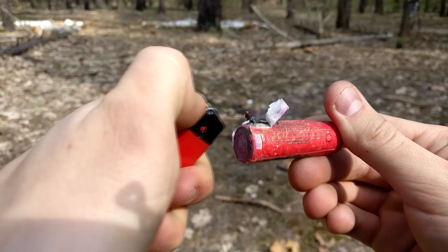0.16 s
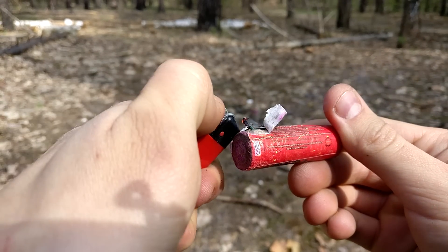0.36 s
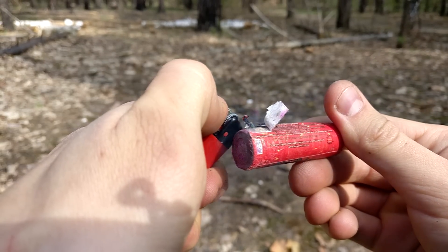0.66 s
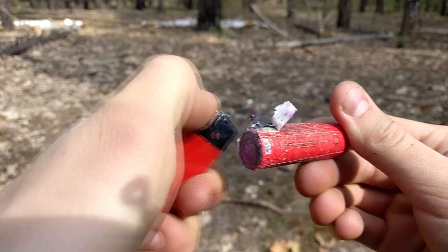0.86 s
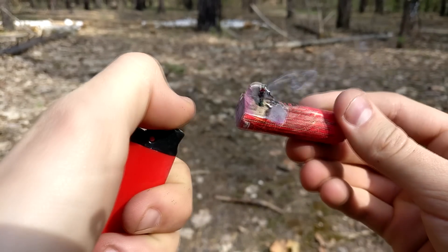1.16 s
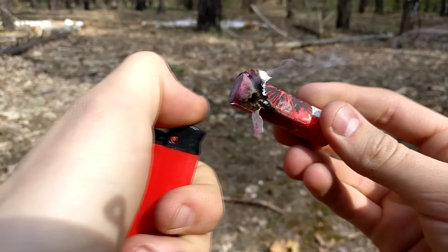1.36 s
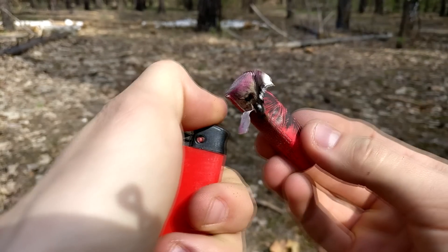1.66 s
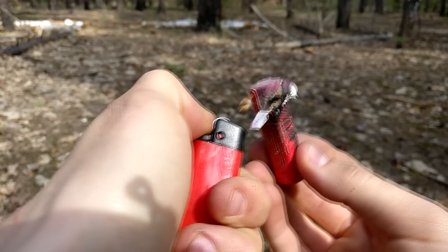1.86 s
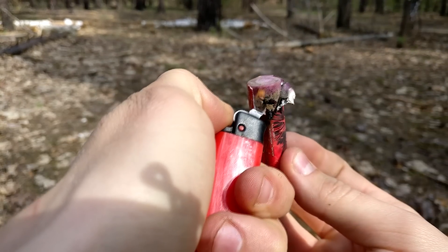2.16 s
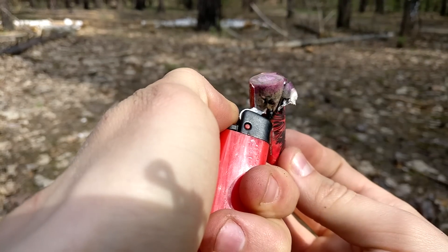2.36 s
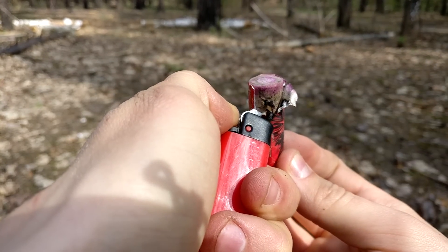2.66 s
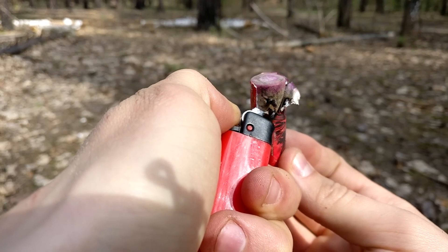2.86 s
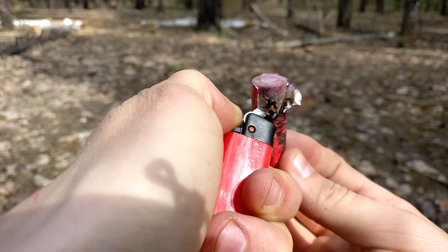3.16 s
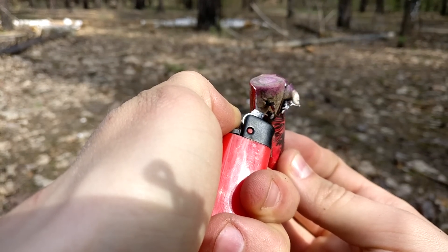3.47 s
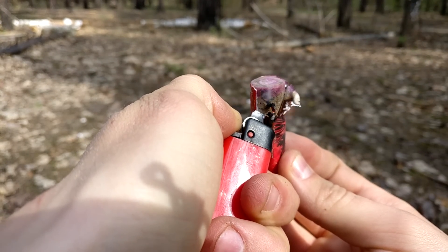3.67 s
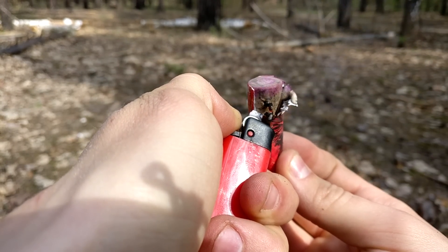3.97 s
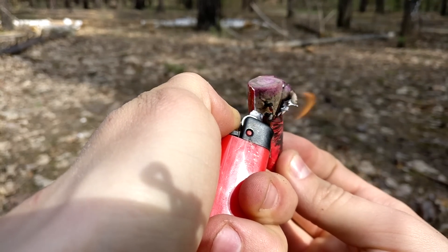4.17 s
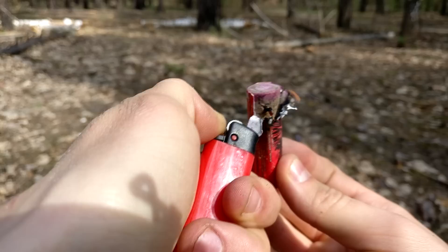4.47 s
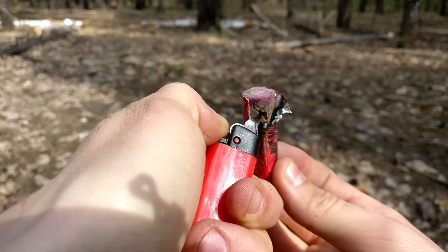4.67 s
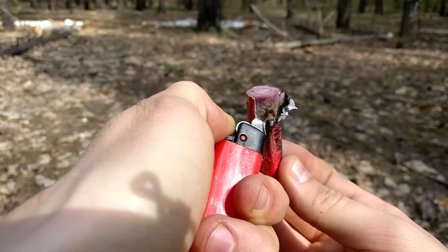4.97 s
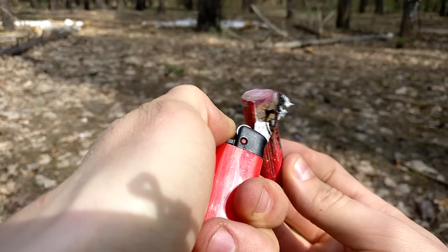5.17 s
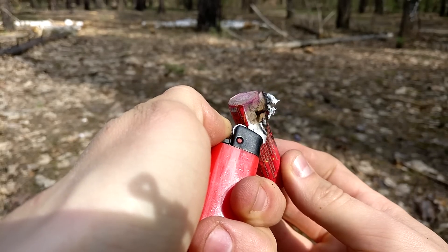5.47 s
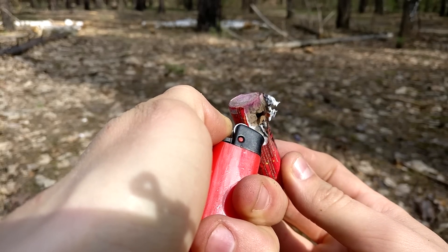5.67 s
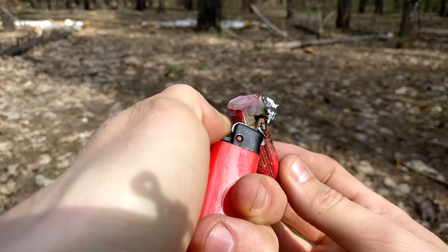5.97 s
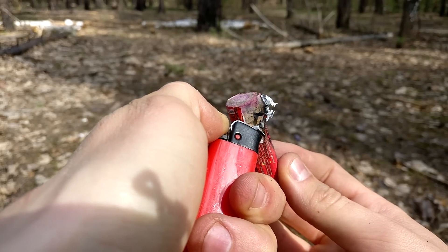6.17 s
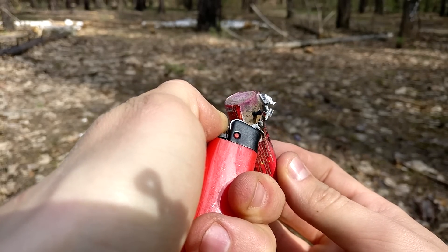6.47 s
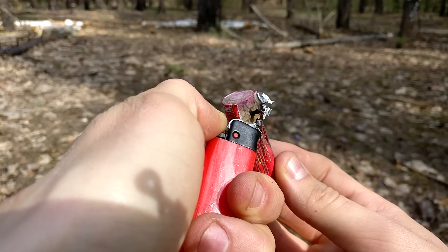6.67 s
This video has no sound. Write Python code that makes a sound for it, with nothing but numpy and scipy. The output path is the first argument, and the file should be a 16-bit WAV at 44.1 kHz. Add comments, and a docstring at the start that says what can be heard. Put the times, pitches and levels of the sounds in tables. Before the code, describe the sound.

A disposable lighter is struck once up close among light finger ticks, with wind rumbling on the microphone and faint forest birds.

```python
"""The tail of a flint stroke, close to a stereo microphone in a wood; then the disposable lighter is
struck in full, its wheel rasping on the flint and its metal parts clicking. Gas hisses from the valve,
the flame pops softly, and fingers rub and tick on the plastic case. Further off, one bird whistles
while two others pipe and chip, all echoing from the trunks. Wind rumbles on the microphone throughout."""
import sys
import numpy as np
from scipy import signal
from scipy.fft import rfft, irfft, next_fast_len
from scipy.io import wavfile

SR = 44100
rng = np.random.default_rng(int(sys.argv[2]) if len(sys.argv) > 2 else 0)


def store_wav(level_fs):
    """Save 16-bit WAV to argv[1]."""
    pcm = np.round(np.clip(np.atleast_2d(level_fs), -1, 1) * 32767)
    wavfile.write(sys.argv[1], SR, pcm.T.astype(np.int16))


N = 301321
TIME = np.arange(N) / SR

# strokes of the flint wheel: (time of top speed [s], level [dB])
STROKES = [(.003, -17.5), (1.7697, -10)]
# the thumb's position colours the rasp, one spectrum a stroke: (frequency [Hz], relative level [dB])
STROKE_COLOURS = [
    [(500, 16), (1900, 3), (2900, -5), (4100, 3.5), (5800, -11.5), (9000, 0.5), (13500, 5.5), (16000, 7)],
    [(450, 6.5), (1450, 9), (2000, 1.5), (2400, -4), (3100, -0.5), (4500, 1), (6100, -1.5), (8800, 0.5),
     (12500, 0.5), (15500, 6.5)],
]
# clicks of wheel, spring and lever: (time [s], level [dB], gain below the treble [dB])
CLICKS = [(1.64, -25.5, -1.5), (1.6852, -30, 8.5), (1.696, -22, 7), (1.704, -23, 1.5), (1.708, -30.5, -0.5),
          (1.7112, -23, -1), (1.7172, -13.5, 7.5), (1.7402, -4, 0), (1.7592, 13, -11.5), (1.7668, 11, -14),
          (1.811, -5, -9)]
# narrow peaks that colour the strike's rasp and clicks: (frequency [Hz], width [Hz], relative level [dB])
STRIKE_PEAKS = [(2503, 20, 12), (3047, 35, 11.5), (4405, 70, 16.5), (5328, 75, 13), (6605, 50, 9),
                (7115, 30, 8), (7705, 50, 11), (9888, 25, 6), (10232, 35, 6), (10980, 45, 6),
                (11265, 40, 7), (11580, 28, 7), (13289, 30, 2), (13600, 32, 6)]
# colour of the hand-held lighter at the microphone's two ports: (frequency [Hz], left [dB], right [dB])
LIGHTER_COLOUR = [(28.5, -47.5, -50), (151.5, -24, -20), (444, -23.5, -24), (801, -32, -15),
                  (1860, -9, -9.5), (2274, 0.5, 0.5), (2680, -1.5, 10), (3915, -0.5, 0), (5610, 0, -3.5),
                  (6870, 5, 3), (7850, -9.5, -12), (8700, -13, -1), (10340, -15, 2.5), (14000, -9, 2),
                  (15700, -10, -9)]
# the lighter's phase between the ports: (frequency [Hz], lead of the left port [rad])
LIGHTER_PHASE = [(0, 0), (1400, -1.5), (2200, -2.5), (3500, -4.5), (5600, -6.5), (7200, -1.5), (8100, -8),
                 (10500, -8), (12200, -8), (14400, 3.5), (16000, 0.5)]
# gas flowing while the lever is held: (start [s], length [s], level [dB], lag of the left port [s])
BURNS = [(-.03, 0.23, -47.5, 0.00017), (3.987, 0.44, -51, 0.00013)]
# colour of the gas jet at the ports: (frequency [Hz], left [dB], right [dB])
GAS_COLOUR = [(500, -10, -10), (1200, 3, -5.5), (2230, -10, -8), (2770, -1.5, 4), (3200, 3.5, 8),
              (3870, -4, 0.5), (4510, -10, 3), (4830, -13, -9), (5650, -4.5, -8), (6000, -19, -16),
              (7300, -37, -27), (9500, -18, -13.5), (11900, -45, -5.5), (13100, -7, -7), (13800, -18, -12),
              (15000, -14, -9), (15500, -6, -1.5)]
# soft pops of the flame and bumps of the hand: (time [s], thump [dB], snap [dB])
POPS = [(0.1314, -38, -27), (0.1645, -39, -28), (0.212, -46, -30), (0.2988, -31.5, -42),
        (3.453, -30, -24.5), (4.3081, -34.5, -28), (4.3186, -45, -32)]
# colour of a pop's snap: (frequency [Hz], relative level [dB])
SNAP_COLOUR = [(100, 12), (500, 18.5), (1100, 10), (2500, 8), (6000, -5), (9000, -35), (16000, -57)]
# light taps on the metal hood: (time [s], level [dB])
HOOD_TAPS = [(2.072, -26), (2.12, -23.5)]
# ringing of the hood: (frequency [Hz], width [Hz], relative level [dB])
HOOD_MODES = [(3100, 120, -3.5), (5930, 130, 0), (8320, 150, 4), (9640, 70, -7), (10850, 33, -9),
              (13270, 130, 3)]
# skin sliding on plastic: (middle [s], length [s], level [dB])
RUBS = [(0.462, 0.22, -57.5), (0.741, 0.041, -56), (0.876, 0.12, -55.5), (1.17, 0.04, -48),
        (1.206, 0.2, -55), (1.367, 0.069, -59), (2.77, 0.31, -65), (3.22, 0.9, -65.5), (3.7, 0.21, -59.5),
        (3.937, 0.34, -68), (4.76, 0.29, -66.5), (5.865, 0.18, -62.5)]
# the sharpest ticks of nails on plastic, and at 1.616 s the two lighters' cases knocking together: (time [s],
# snap [dB], ring of the case [dB])
NAIL_TICKS = [(0.3275, -26.5, -41), (.4735, -27, -40), (0.498, -33, -43), (.671, -32, -54),
              (.8777, -24.5, -45), (.909, -36, -36), (1.061, -31.5, -45), (1.105, -40, -39),
              (1.17, -19, -48), (1.184, -14.5, -30), (1.278, -46, -34), (1.291, -13.5, -42),
              (1.298, -23.5, -40), (1.348, -39, -36), (1.368, -34, -33), (1.38, -30.5, -33.5),
              (1.616, -23, -19.5), (2.92, -27, -43), (3.6755, -24, -41), (3.704, -30, -44),
              (3.746, -27, -44), (3.7662, -29, -41), (3.774, -35, -45), (3.897, -30, -50),
              (3.926, -29, -52), (3.9824, -25.5, -47), (4.002, -33, -46), (4.742, -28.5, -33),
              (5.5494, -25.5, -40), (5.938, -33, -44)]
# ringing of the hollow plastic case: (frequency [Hz], width [Hz], relative level [dB])
CASE_MODES = [(2970, 160, -7), (3623, 260, 4.5), (6435, 250, -2)]
# the nearest bird: (start [s], length [s], top pitch [Hz], crest [share of the note],
# fall [share of the pitch], level before the accent [dB], accent [weight])
WHISTLES = [(.368, .183, 4630, .36, .1, -57, 1), (1.455, .19, 4570, .31, .055, -61, 3),
            (2.443, .185, 4560, .5, .06, -63.5, 5), (3.393, .202, 4570, .4, .07, -60, 4.5),
            (4.865, .203, 4560, .6, .065, -68.5, 5), (6.15, .217, 4540, .52, .07, -65.5, 4)]
# a far bird, loudest in mid-phrase: (start [s], length [s], pitch [Hz], level [dB])
PIPES = [(1.275, .07, 3320, -66), (1.635, .07, 3300, -64), (1.978, .075, 3280, -61),
         (2.355, .09, 3260, -61.5), (2.715, .115, 3240, -62.5), (3.105, .085, 3210, -65.5)]
# rumble of wind on the microphone: (frequency [Hz], relative level [dB])
WIND_COLOUR = [(15, -65.5), (25, -42), (32, -34.5), (40, -15), (50, 2), (60, 0.5), (72, 0.5), (90, -6),
               (125, -8.5), (160, -13), (220, -20), (320, -28.5), (420, -39.5), (600, -72)]
# eddies that strike the ports unequally: (middle [s], length [s], left [dB], right [dB])
BUFFETS = [(0.03, 0.57, -55, -41), (0.28, 0.35, -40, -43), (0.595, 0.31, -46, -68), (0.895, 0.89, -49, -66),
           (1.159, 0.094, -63, -43), (3.46, 0.057, -39, -53), (3.685, 0.42, -45.5, -56),
           (3.918, 0.09, -54, -44), (4.763, 0.056, -44.5, -55), (6.485, 0.081, -52, -61)]
# air in the trees: (frequency [Hz], relative level [dB])
AIR_COLOUR = [(220, -41), (380, -8), (571, -5.5), (722, -0.5), (913, 0), (1070, 1.2), (1460, -2.5),
              (2090, -12), (2860, -16.3), (4230, -17), (6770, -26), (10500, -26), (16000, -19.5)]
# how alike moving air is at the two ports: (frequency [Hz], correlation [0-1])
PORT_LIKENESS = [(30, 0.89), (70, 1), (130, 0.96), (300, 0.87), (600, 0.42), (1200, 0.13), (3000, 0.25),
                 (8000, 0.11), (16000, 0.25)]


def flint_wheel(teeth_per_s=420, uneven=0.3, tooth_decay=2.3, flying_db=-4.5):
    """Each tooth tears a spray of grit off the flint; flying grit reaches each port differently."""
    force = np.zeros((2, N))
    for stroke, colour in zip(STROKES, STROKE_COLOURS):
        tooth_phase = np.cumsum(teeth_per_s * (1 + uneven * wander(300))) / SR % 1
        on_flint, *flying = [grit(per_s=22000, spread_db=3.4) for _ in range(3)]
        spray = np.exp(-tooth_decay * tooth_phase) * (on_flint + amp(flying_db) * np.array(flying))
        rasp = signal.oaconvolve(spray, impulse(colour)[None], axes=1)[:, :N]
        force += unit_rms(rasp) * stroke_gain(*stroke)
    return force


def stroke_gain(top_s, db, bite_s=0.068, round_s=0.0051, swell_db_per_s=558, stop_db_per_s=1080.5):
    """The wheel bites, speeds up to a rounded top and stops faster than it grew; sparks fizz on."""
    t = TIME - top_s
    from_top = np.hypot(t, round_s) - round_s
    rasp = amp(-from_top * np.where(t < 0, swell_db_per_s, stop_db_per_s)) * (t > -bite_s)
    sparks = amp(-38 - 123.5 * from_top) * (t > 0)
    return amp(db) * (rasp + sparks)


def contacts(rows, chatter_s=.0008, snap=4):
    """Metal parts meet hard, each contact followed by a brief chatter."""
    force, t = np.zeros(N), np.arange(512) / SR
    for s, db, body_db in rows:
        contact = rng.standard_normal(len(t)) * np.exp(-t / chatter_s)
        contact[0] = snap
        add(force, s, amp(db) * firmness(unit_energy(contact), body_db))
    return force


def plastic_case(force, ring_db=-3, hz=3600, width_hz=450):
    """The case adds one short hollow ring to whatever strikes it."""
    return force + amp(ring_db) * signal.lfilter(*signal.iirpeak(hz, hz / width_hz, fs=SR), force)


def strike_colour(force, peaks_db=-8, widen_hz=34, scatter_db=-7, scatter_s=0.002):
    """Narrow peaks colour the rasp and clicks of the strike, and the sound scatters between the hands."""
    t = np.arange(SR // 8) / SR
    scatter = rng.standard_normal((2, len(t))) * np.exp(-t / scatter_s)
    scatter /= np.linalg.norm(scatter[0])
    response = amp(peaks_db) * damped_tones(STRIKE_PEAKS, t, widen_hz) + amp(scatter_db) * scatter
    response[:, 0] += 1  # the direct sound
    sides = signal.oaconvolve(force, response / np.linalg.norm(response[0]), axes=1)[:, :N]
    return at_ports(sides, LIGHTER_COLOUR, LIGHTER_PHASE)


def gas_jet(flutter_db=0.9, open_s=0.022, shut_s=0.068, sag_db_per_s=5):
    """The valve opens, the jet hisses and sags, the valve shuts; the right port hears it first."""
    hiss = rng.standard_normal(N) * amp(flutter_db * wander(45))
    out = np.zeros((2, N))
    for start, length, db, lag in BURNS:
        t = np.maximum(TIME - start, 0)
        opening = np.clip(t / open_s, 0, 1) * np.clip(1 - (t - length) / shut_s, 0, 1)
        flow = opening * amp(db - sag_db_per_s * t)
        out += at_ports(hiss * flow, GAS_COLOUR, [(0, 0), (SR / 2, -np.pi * SR * lag)])
    return out


def pops(thump_hz=190, thump_s=0.0019):
    """Each pop of the flame or bump of the hand is a snap and a short push of air, dead centre."""
    out, snap = np.zeros(N), impulse(SNAP_COLOUR)
    t = np.arange(len(snap)) / SR
    thump = 2 * np.sin(2 * np.pi * thump_hz * t) * np.exp(-t / thump_s)
    for s, thump_db, snap_db in POPS:
        add(out, s, -amp(thump_db) * thump - amp(snap_db) * snap)
    return out


def hood_clinks(snap_db=-4, body_db=-4):
    """The thin metal hood is tapped and rings briefly."""
    force = np.zeros(N)
    ring = damped_tones(HOOD_MODES, np.arange(SR // 16) / SR)
    for s, db in HOOD_TAPS:
        add(force, s, amp(db) * ring)
    return force + contacts([(s, db + snap_db, body_db) for s, db in HOOD_TAPS])


def finger_rubs(body_db=-4, resting_db=-69):
    """Skin sticks and slips in small grains, faintly even while the grip rests."""
    pressure = amp(resting_db + 2.5 * wander(3))
    for s, length, db in RUBS:
        pressure += amp(db) * swell(s, length)
    grains = grit(per_s=5000, spread_db=4.5) * amp(2.6 * wander(70))
    return firmness(unit_rms(grains), body_db) * pressure


def nail_ticks(chatter_s=.0006, snap_hz=7500):
    """A nail slips with a bright snap, and the hollow case rings briefly."""
    force, t = np.zeros(N), np.arange(1024) / SR
    ring = damped_tones(CASE_MODES, t, wave=np.sin)
    highpass = signal.butter(2, snap_hz, "high", fs=SR, output="sos")
    for s, snap_db, ring_db in NAIL_TICKS + grip_ticks():
        snap = signal.sosfilt(highpass, rng.standard_normal(len(t)) * np.exp(-t / chatter_s))
        add(force, s, amp(snap_db) * unit_energy(snap) + amp(ring_db) * ring)
    return force


def grip_ticks(per_s=3, db=-41, spread_db=4, ring_db=-8):
    """Rows of fainter ticks, which come by chance as the grip shifts."""
    when, size = rng.random((round(per_s * N / SR), 2)).T
    levels = db + spread_db * (2 * size - 1)
    return list(zip(when * N / SR, levels, levels + ring_db))


def whistling_bird(accent_at=.8, accent_share=.66, trill_hz=65, trill_depth=.4, echo_db=-69):
    """The nearest bird: arched whistles, each pressed into a trilled accent as it falls."""
    trill = np.sin(2 * np.pi * np.cumsum(trill_hz * (1 + .2 * wander(40))) / SR)
    accents = sum(weight * swell(s + accent_at * length, accent_share * length)
                  for s, length, *_, weight in WHISTLES)
    press = amp(accents * (1.5 + trill_depth * trill))
    direct = birdsong(WHISTLES, rise=.05, hook=.08) * press
    # the direct level varies from call to call; the wood's answer hardly does
    outward = birdsong([(*row[:5], echo_db) for row in WHISTLES], rise=.05, hook=.08) * press
    shimmer = amp(1.8 * np.array([wander(30), wander(30)]))
    return direct * shimmer + tree_echoes(outward, t60_s=1.9)


def piping_bird(crest=.65, fall=-.007):
    """Far off, a phrase of short notes, each sagging and a shade lower than the last."""
    return birdsong([(s, length, hz, crest, fall, db) for s, length, hz, db in PIPES], rise=-.025)


def chipping_bird(start_s=2.574, every_s=.104, length_s=.017, hz=3880, crest=.1, fall=.12, db=-66):
    """Far off, a quick run of seven chips, each dropping steeply."""
    return birdsong([(start_s + k * every_s, length_s, hz, crest, fall, db) for k in range(7)], rise=0)


def birdsong(notes, rise, hook=0, waver=0.0044, flicker_db=1.5):
    """Pure notes swell and fade; rise, fall and the last downward hook are shares of the pitch."""
    song, drift = np.zeros(N), 1 + waver * wander(110)
    for s, length, hz, crest, fall, db, *_ in notes:
        progress = np.linspace(0, 1, int(length * SR))
        from_crest = np.interp(progress, [0, crest, 1], [-1, 0, 1])
        arch = np.where(progress < crest, rise, fall) * from_crest ** 2
        pitch = hz * (1 - arch - hook * progress ** 30) * drift[int(s * SR):][:len(progress)]
        gain = amp(db) * abs(np.sin(np.pi * progress ** 1.5)) ** 0.42
        add(song, s, gain * np.sin(2 * np.pi * np.cumsum(pitch) / SR))
    return song * amp(flicker_db * wander(48))


def tree_echoes(x, t60_s, echoes_per_s=1500, first_s=.012):
    """Trunks throw back sparse echoes, different at each port."""
    t = np.arange(SR) / SR
    taps = rng.standard_normal((2, SR)) * (rng.random((2, SR)) < echoes_per_s / SR)
    taps *= amp(-60 * t / t60_s) * (t > first_s)
    return signal.fftconvolve(x[None], taps / np.linalg.norm(taps[0]), axes=1)[:, :N]


def wind_buffets():
    """Each eddy rumbles on the two ports separately, in the colour of the wind."""
    hz = np.fft.rfftfreq(N, 1 / SR)
    rumble = unit_rms(irfft(rfft(rng.standard_normal((2, N))) * amp(lookup(WIND_COLOUR, hz)), N))
    return rumble * sum(amp([[left], [right]]) * swell(s, length) for s, length, left, right in BUFFETS)


def breeze(colour, db, swell_db, swell_hz):
    """Moving air, alike at both ports in the bass, swelling by chance."""
    hz = np.fft.rfftfreq(N, 1 / SR)
    left, unrelated = rfft(rng.standard_normal((2, N)))
    likeness = lookup(PORT_LIKENESS, hz)
    right = likeness * left + np.sqrt(1 - likeness ** 2) * unrelated
    pair = irfft(np.array([left, right]) * amp(lookup(colour, hz)), N)
    return amp(db) * unit_rms(pair * amp(swell_db * wander(swell_hz)))


def at_ports(x, colour, phase):
    """A close source reaches each port of the microphone with its own colour and delay."""
    size = next_fast_len(N + SR // 4)
    hz = np.fft.rfftfreq(size, 1 / SR)
    left = rfft(impulse(colour), size)
    lead = np.interp(hz, *np.transpose(phase))
    right = left * amp(lookup(colour, hz, column=2) - lookup(colour, hz)) * np.exp(-1j * lead)
    return irfft(rfft(x, size) * unit_rms(np.array([left, right])), size)[:, :N]


def damped_tones(peaks, t, widen_hz=0, wave=np.cos):
    """One dying tone for each spectral peak, the wider the shorter, with a total energy of 1."""
    return unit_energy(sum(amp(db) * np.exp(-np.pi * (width + widen_hz) * t) * wave(2 * np.pi * hz * t)
                           for hz, width, db in peaks))


def firmness(x, body_db, split_hz=8500):
    """A light touch excites mostly treble, a firm one the whole body."""
    low = signal.sosfiltfilt(signal.butter(2, split_hz, fs=SR, output="sos"), x)
    return x + (amp(body_db) - 1) * low


def grit(per_s, spread_db):
    """Tiny fractures of uneven size at random moments."""
    size = amp(spread_db * np.minimum(rng.exponential(1, N), 3))
    return unit_rms(size * rng.choice([-1, 1], N) * (rng.random(N) < per_s / SR))


def impulse(colour, size=4096):
    """Minimum-phase response of energy 1: the given spectrum with a sharp start."""
    log_gain = np.log(amp(lookup(colour, abs(np.fft.fftfreq(size, 1 / SR)))))
    spectrum = np.exp(np.conj(signal.hilbert(log_gain)))
    return unit_energy(np.fft.ifft(spectrum).real[:size // 2])


def wander(rate_hz):
    """Smooth random drift of rms 1."""
    hz = np.fft.rfftfreq(N, 1 / SR)
    return unit_rms(irfft(rfft(rng.standard_normal(N)) * np.exp(-(hz / rate_hz) ** 2), N))


def swell(middle, length):
    """A smooth rise and fall round one moment."""
    return np.cos(np.pi * np.clip((TIME - middle) / length, -.5, .5)) ** 2


def lookup(points, hz, column=1):
    """One column of a spectrum table, on a log-frequency axis."""
    table = np.array(points, float)
    return np.interp(np.log(hz + 1), np.log(table[:, 0] + 1), table[:, column])


def add(mix, s, sound):
    """Mixes a sound in at a time."""
    part = mix[max(round(s * SR), 0):][:len(sound)]
    part += sound[:len(part)]


def amp(db):
    """Decibels to gain."""
    return 10 ** (np.asarray(db) / 20)


def unit_rms(x):
    """Scales to rms 1."""
    return x / np.sqrt(np.mean(abs(x) ** 2) + 1e-20)


def unit_energy(x):
    """Scales to energy 1."""
    return x / np.linalg.norm(x)


def scene():
    """The lighter close to the microphone, birds off among the trees, wind all round."""
    strikes = strike_colour(flint_wheel() + plastic_case(contacts(CLICKS)))
    handling = at_ports(finger_rubs() + nail_ticks() + hood_clinks(), LIGHTER_COLOUR, LIGHTER_PHASE)
    close = strikes + handling
    far_birds = piping_bird() + chipping_bird()
    wind = breeze(WIND_COLOUR, db=-44, swell_db=1.9, swell_hz=1.74) + wind_buffets()
    air = breeze(AIR_COLOUR, db=-56.1, swell_db=0.35, swell_hz=1.3)
    echoes = amp(-36.5) * tree_echoes(close.mean(0), t60_s=0.54)
    echoes += amp(-8) * tree_echoes(far_birds, t60_s=1.8)
    return close + gas_jet() + pops() + whistling_bird() + far_birds + echoes + wind + air


def record(dry):
    """The recorder clips the sharpest peaks at full scale, then cuts the treble above 15.8 kHz."""
    lowpass = signal.firwin(511, 15820, window=("kaiser", 9), fs=SR)
    return signal.oaconvolve(np.clip(dry, -1, 1), lowpass[None], "same")


dry = scene()
out = record(dry)
store_wav(out)
```